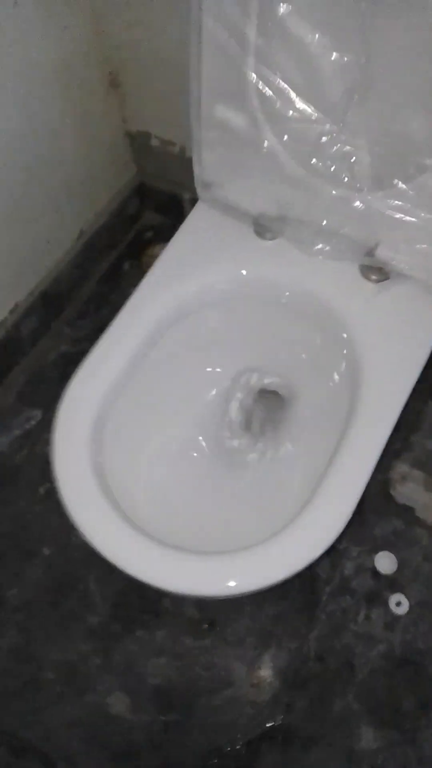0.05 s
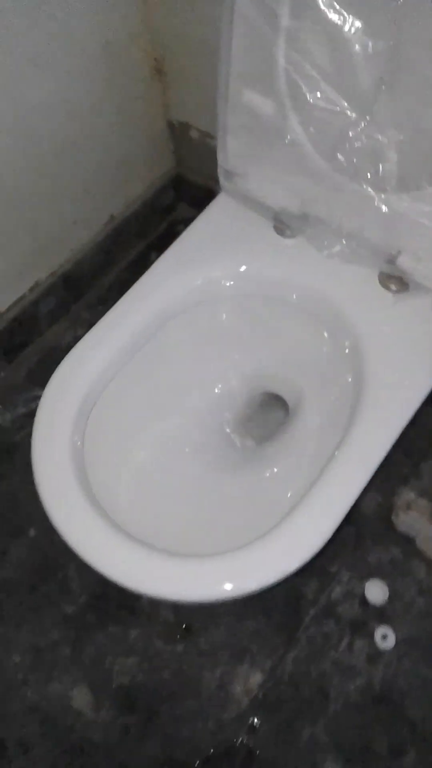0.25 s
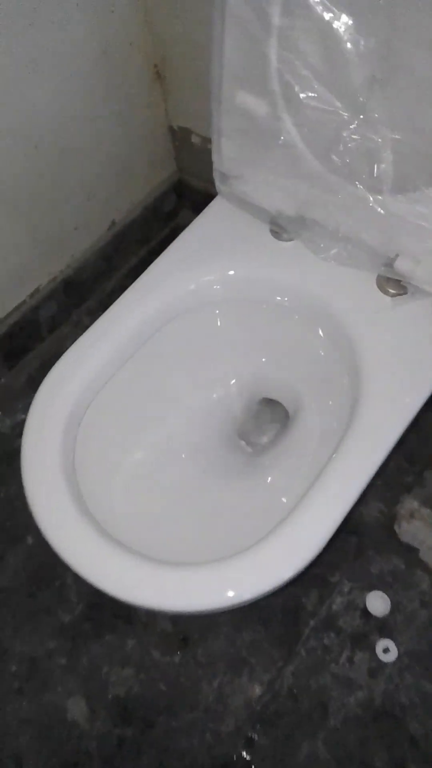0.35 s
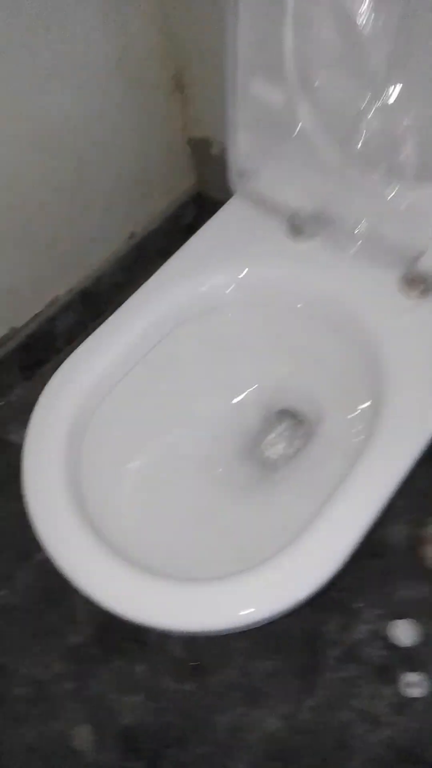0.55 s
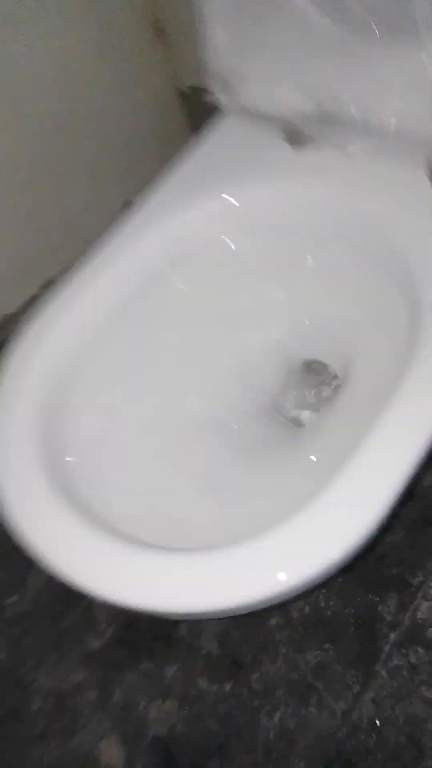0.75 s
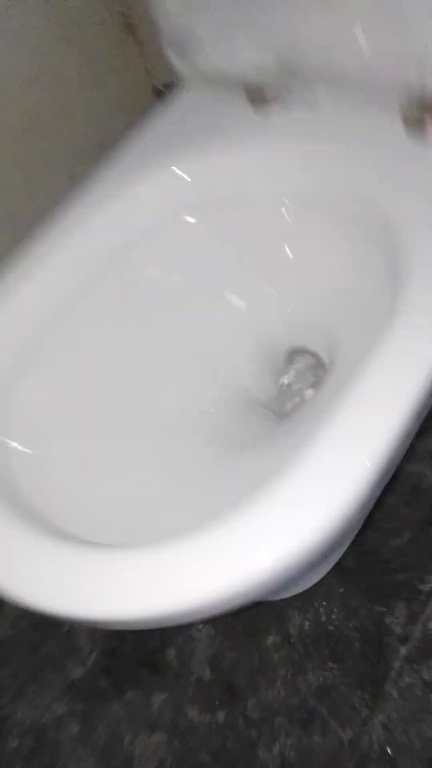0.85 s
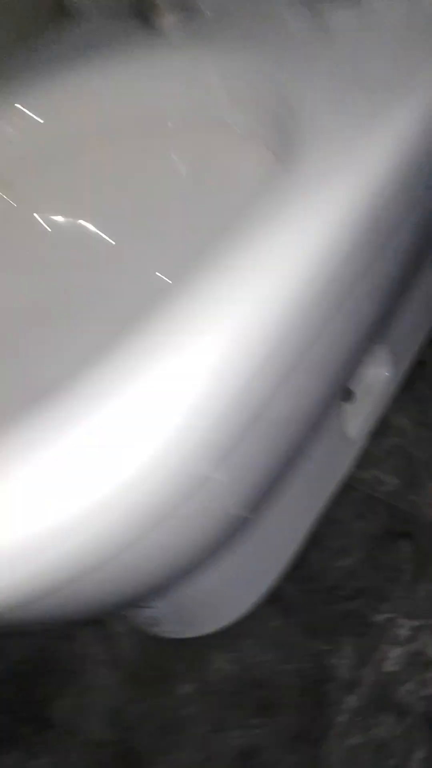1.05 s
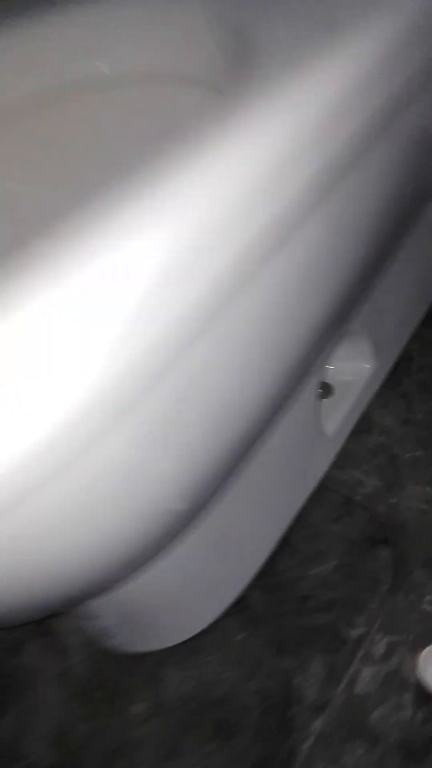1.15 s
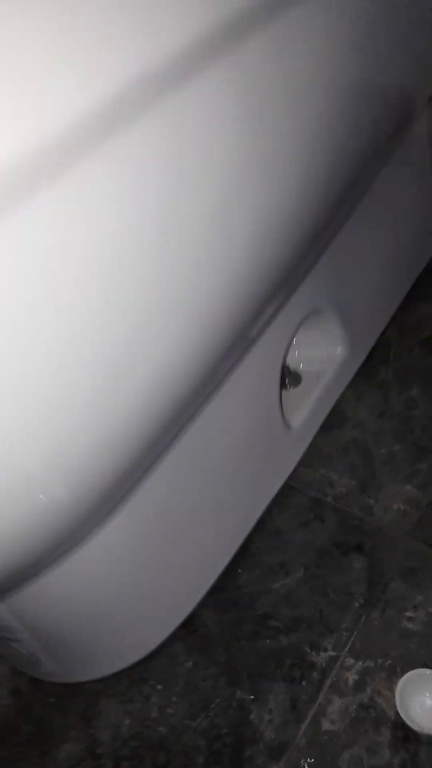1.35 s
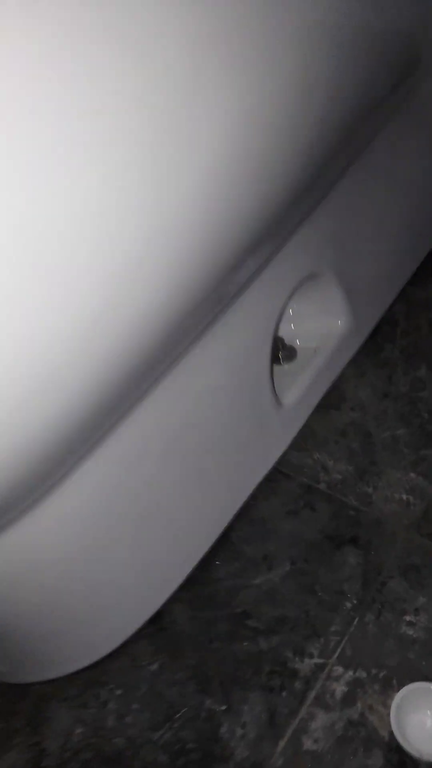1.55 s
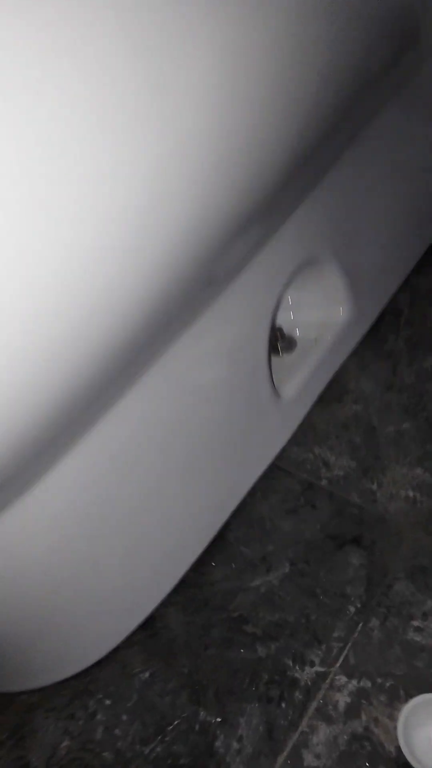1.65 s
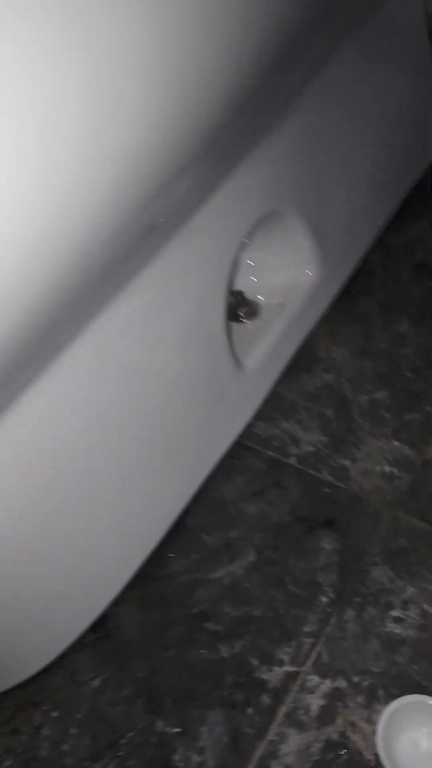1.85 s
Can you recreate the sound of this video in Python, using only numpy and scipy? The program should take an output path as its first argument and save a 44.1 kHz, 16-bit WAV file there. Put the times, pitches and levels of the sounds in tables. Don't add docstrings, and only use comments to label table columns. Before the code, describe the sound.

An empty plastic bucket gives a short rasp, then bangs hollowly on bathroom tiles with gritty rocking clacks; the echo fades over a faint drain gurgle, small ticks, then cloth rustle and soft steps, heard close.

```python
import sys
import numpy as np
from scipy import signal
from scipy.io import wavfile
from scipy.ndimage import uniform_filter1d

SR = 44100
rng = np.random.default_rng(int(sys.argv[2]) if len(sys.argv) > 2 else 0)


def to_linear_factor(level_db):
    exponent = np.asarray(level_db, float) / 20
    return 10 ** exponent


def waveform_to_disk(signal):
    frames = np.transpose(np.atleast_2d(signal))
    scaled = np.clip(frames, -1, 1) * 32767
    samples = np.round(scaled).astype(np.int16)
    wavfile.write(sys.argv[1], SR, samples)


N = 83790
TIME = np.arange(N) / SR


# time in seconds, level in dB.
SLIDE_PRESSURE = [
    (0, -59),
    (.05, -49),
    (.075, -34),
    (.095, -29),
    (.125, -37.5),
    (.16, -44.5),
    (.215, -53.5),
    (.25, -70.5),
]
# frequency in Hz, density in dB per Hz.
SLIDE_SPECTRUM = [(110, -45.5), (180, -17), (337, -10.5), (415, -9), (490, -26), (879, -6.5), (1390, -6),
                  (2230, -17), (5000, -44), (6500, -75), (11000, -120)]
# frequency in Hz, width in Hz, level in dB.
SLIDE_MODES = [(400, 68, -10.5), (830, 60, -5.5), (972, 21, 2), (1165, 100, -10.5), (1380, 56, 3.5),
               (1760, 40, -4.5), (1950, 60, -11), (2170, 80, 4), (2450, 70, 1), (3350, 64, 2)]


def bucket_slide():
    rasp = colour(grains(3), SLIDE_SPECTRUM)
    pressure_db = np.interp(TIME, *np.transpose(SLIDE_PRESSURE), right=-120)
    return to_linear_factor(pressure_db) * evened(rasp + 1.5 * resonances(rasp, SLIDE_MODES))


# start in seconds, rise in seconds, hold in seconds,
# body level in dB, grit level in dB.
CONTACTS = [(0.2201, 0.0011, 0.0077, -15.5, -24), (0.23, 0.0023, 0.014, -19.5, -37.5),
            (0.244, .003, 0.026, -33.5, -33), (0.271, .003, .005, -20, -40),
            (0.277, .005, 0.016, -25, -24.5), (0.301, .002, 0.0047, -49, -27),
            (0.309, .003, 0.0074, -25.5, -28.5), (0.326, .003, .004, -40, -40),
            (0.345, 0.003, 0.012, -30.5, -36), (0.368, .002, 0.0014, -47, -51),
            (0.3802, 0.001, 0.0039, -25, -23), (0.384, 0.005, 0.01, -27.5, -21.5),
            (0.409, .002, 0.0013, -33, -42), (0.413, 0.004, 0.0041, -40, -30),
            (0.429, 0.0087, 0.0077, -39, -29), (0.509, 0.0012, 0.0028, -36.5, -46)]
# time in seconds, level in dB.
RIM_BLOWS = [(0.2212, 4), (0.2243, 3), (0.2256, 1.5), (0.2263, 4), (0.2291, 8), (0.2383, 5.5), (0.244, -3),
             (0.2881, 3.5), (0.2994, -4.5), (0.3803, -4.5), (0.3861, -1.5), (0.507, -21)]
# frequency in Hz, density in dB per Hz.
BODY_SPECTRUM = [(90, -28), (170, -26), (205, -13.5), (445, -4.5), (600, -14), (860, 2), (1400, -3),
                 (2300, -5.5), (2650, -11.5), (2950, -21)]


def bucket_body():
    fall_s, grain_spread_db = 0.022, 4
    push = sum(stroke(start, rise, hold, db, fall_s) for start, rise, hold, db, _ in CONTACTS)
    push = push * grains(grain_spread_db)
    blows = np.zeros(N)
    for start, db in RIM_BLOWS:
        blows[round(start * SR)] = -to_linear_factor(db)
    rim_hz, rim_width_hz, rim_db = 2248, 270, -1
    clack = to_linear_factor(rim_db) * resonate(blows, rim_hz, rim_width_hz)
    return colour(push + blows + clack, BODY_SPECTRUM)


# frequency in Hz, density in dB per Hz.
GRIT_SPECTRUM = [(1760, -38.5), (3000, -9.5), (3170, -6), (6710, -8.5), (9530, 0), (12000, 1.5),
                 (14800, -5.5), (16000, -19)]
# start in seconds, rise in seconds, hold in seconds, level in dB.
CRACKS = [
    (0.2173, .001, 0.016, -33.5),
    (0.367, .001, .002, -31.5),
    (0.3763, .001, 0.011, -24.5),
    (0.43, .001, 0.0018, -37.5),
    (1.5, 0.0043, 0.021, -50),
    (1.7742, 0.00078, 0.0028, -59.5),
    (1.835, 0.0046, 0.015, -56),
]
# frequency in Hz, density in dB per Hz.
CRACK_SPECTRUM = [(1800, -15), (2800, 6.5), (4200, 3), (6000, -2), (8500, -16)]


def bucket_grit():
    fall_s = 0.035
    drag = sum(stroke(start, rise, hold, db, fall_s) for start, rise, hold, _, db in CONTACTS)
    grit = colour(drag * grains(1.5), GRIT_SPECTRUM)
    crack = sum(stroke(*row, fall_s) for row in CRACKS)
    return grit + colour(crack * grains(3), CRACK_SPECTRUM)


# frequency in Hz, level in dB, 60 dB decay time in seconds.
RING_MODES = [(207.8, 1, 1), (295.7, -2.5, 0.78), (305.5, 0.5, 0.53), (358.3, -7, 0.7), (413.5, 2, 0.55),
              (437.7, 2.5, 0.93), (436.4, -1.5, 1), (806, -8, 0.79), (867, -11, 0.13), (888, -8, 0.85),
              (922, -12.5, 0.25), (1144, -16, .3), (1290, -6, 0.13), (1456, -9, 0.69)]


def bucket_ring(body):
    bend = 0.012
    settle_s, base_hz, settled_t60_s = 0.447, 250, 0.1
    drift = uniform_filter1d(rng.standard_normal((len(RING_MODES), N // 512 + 2)), 5, 1)
    drift_time = np.arange(drift.shape[1]) * 512 / SR
    total = np.zeros(N)
    for (hz, db, t60), wander in zip(RING_MODES, drift):
        pitch = hz * (1 + bend * np.interp(TIME, drift_time, evened(wander)))
        gain = to_linear_factor(db) / np.sqrt(t60) * t60 * SR / 14
        mode = gain * resonate(body, pitch, 2.6 / t60)
        if hz < base_hz:
            mode = mode * to_linear_factor(-60 * np.maximum(TIME - settle_s, 0) / settled_t60_s)
        total += mode
    return total / np.sqrt(SR * len(RING_MODES) / 60)


def bucket():
    body, grit, slide = bucket_body(), bucket_grit(), bucket_slide()
    wet = room(to_linear_factor(-4.5) * body + to_linear_factor(-9.5) * grit + to_linear_factor(-8.5) * slide)
    return body + grit + slide + to_linear_factor(-9.5) * bucket_ring(body) + wet


# time in seconds, hiss level in dB, rub pitch in Hz, rub level in dB.
CLOTH_MOTION = [(0, -58, 2500, -90), (0.202, -60.5, 3500, -69.5), (0.759, -54, 4540, -65),
                (0.862, -59, 3040, -87), (1.048, -54, 1474, -63), (1.088, -64.5, 1340, -70),
                (1.22, -64, 867, -70), (1.309, -56.5, 1100, -49.5), (1.355, -48.5, 1515, -54),
                (1.42, -41.5, 1947, -44.5), (1.49, -49, 2400, -54.5), (1.518, -42.5, 2800, -50),
                (1.575, -44.5, 2276, -60), (1.62, -53, 2920, -66.5), (1.68, -72, 3036, -79),
                (1.785, -83.5, 1590, -91), (1.797, -42.5, 1600, -50.5), (1.9, -58.5, 1564, -82)]
# frequency in Hz, density in dB per Hz.
WEAVE_SPECTRUM = [(1470, -33.5), (2500, -9), (2940, -10.5), (3630, -13), (4210, -10.5), (6150, -14.5),
                  (10500, -4.5), (14700, -15.5), (16000, -5)]
# frequency in Hz, width in Hz, level in dB.
BOWL_HOLLOWS = [(813, 40, -5.5), (1100, 90, -3.5), (1370, 150, -2), (1882, 70, -0.5), (2185, 90, -2),
                (2651, 50, -0.5), (2939, 100, 1.5), (3460, 140, 3), (4136, 140, 1.5), (4560, 120, 0),
                (4930, 80, -3)]


def cloth():
    patchy_db, rub_width_hz = 4, 1200
    times, hiss_db, rub_hz, rub_db = np.transpose(CLOTH_MOTION)
    _, _, spectrum = signal.stft(grains(0.78), SR, nperseg=256)
    patches = uniform_filter1d(rng.standard_normal(spectrum.shape), 2, 0)
    patches = evened(uniform_filter1d(patches, 20, 1))
    patchy = signal.istft(spectrum * to_linear_factor(patchy_db * patches), SR, nperseg=256)[1][:N]
    hiss = evened(colour(patchy, WEAVE_SPECTRUM))
    pitch = np.interp(TIME, times, rub_hz)
    rub = resonate(grains(3.5), pitch, rub_width_hz)
    rub = resonate(rub, pitch, rub_width_hz)
    rub = resonances(resonances(rub, BOWL_HOLLOWS), BOWL_HOLLOWS)
    return to_linear_factor(np.interp(TIME, times, hiss_db)) * hiss + to_linear_factor(np.interp(TIME, times, rub_db)) * rub


# start in seconds, rise in seconds, hold in seconds, level in dB.
STEPS = [
    (1.351, 0.00425, 0.0024, -42.5),
    (1.38, 0.009, 0.066, -48.5),
    (1.465, 0.0027, 0.09, -63.5),
    (1.644, 0.00335, .002, -63),
    (1.717, 0.00233, 0.0023, -63.5),
    (1.772, 0.00217, 0.027, -43.5),
    (1.799, .003, 0.018, -39),
    (1.834, 0.0036, 0.023, -43.5),
    (1.863, 0.0031, 0.025, -55),
]
# frequency in Hz, density in dB per Hz.
STEP_SPECTRUM = [(60, -17), (170, -15.5), (215, -3), (300, -3.5), (460, 0.5), (620, -9), (900, -21),
                 (1500, -23)]
# frequency in Hz, width in Hz, level in dB.
FLOOR_MODES = [(469, 20, -0.5), (305, 19, -3), (372, 18, -16), (623, 43, -9.5), (766, 46, -12),
               (930, 63, -6)]


def steps():
    fall_s, heel_db = 0.053, 27
    push = sum(stroke(*row, fall_s) for row in STEPS) * rng.standard_normal(N)
    heels = np.zeros(N)
    for start, rise, hold, db in STEPS:
        heels[round((start + rise) * SR)] = to_linear_factor(db + heel_db - 1400 * rise)
    thud = colour(push + heels, STEP_SPECTRUM)
    boom = sum(to_linear_factor(db + 1.5) * resonate(thud, hz, width) for hz, width, db in FLOOR_MODES)
    dry = thud + boom
    return dry + to_linear_factor(-9.5) * room(dry)


# time in seconds, peak level in dB.
TICKS = [(0.0819, -27), (0.5702, -42), (0.5853, -29.5), (0.5899, -35.5), (0.659, -33), (0.69, -42),
         (0.7259, -33.5), (0.7612, -47), (0.9041, -36.5), (0.9747, -32.5), (0.9844, -37.5), (1.1763, -39.5),
         (1.3582, -24.5), (1.4545, -27.5), (1.502, -33), (1.5644, -32), (1.6398, -44), (1.7756, -37.5),
         (1.798, -27.5), (1.818, -26), (1.876, -52), (1.892, -49)]
# frequency in Hz, density in dB per Hz.
TICK_SPECTRUM = [(880, -35.5), (1500, -3.5), (3520, -10.5), (6630, -13), (10000, -0.5), (12500, -2),
                 (16000, -10)]


def ticks():
    fall_s = 0.019
    snap = sum(stroke(start, 0.00077, 0.0006, db - 10, fall_s) for start, db in TICKS)
    dry = colour(snap * rng.standard_normal(N), TICK_SPECTRUM)
    return dry + to_linear_factor(-6.5) * room(dry)


# time in seconds, level in dB.
DRAIN_LEVEL = [
    (.3, -63),
    (.55, -48.5),
    (0.8, -50),
    (1.0, -53.5),
    (1.06, -85.5),
    (1.297, -59.5),
    (1.6, -52.5),
    (1.75, -61.5),
    (1.9, -62),
]
# frequency in Hz, width in Hz, level in dB.
DRAIN_PIPE = [(215.5, 28, -4.5), (298.8, 72, 0), (372, 37, -4), (434, 18, 3), (790, 49.9, -8),
              (883, 45, -4), (1380, 200, -8.5)]


def drain():
    sag_per_s = 0.074
    bowl_hz, empty_s, fade_s, fade_db = 600, 0.76, 0.047, -27
    noise = rng.standard_normal(N)
    sag = 1 - sag_per_s * np.minimum(TIME - 0.5, 0.5)
    fade = fade_db * np.clip((TIME - empty_s) / fade_s, 0, 1)
    slosh = np.zeros(N)
    for hz, width, db in DRAIN_PIPE:
        once = resonate(noise, hz * sag, width)
        slosh += to_linear_factor(db + fade * (hz > bowl_hz)) * resonate(once, hz * sag, width)
    times, level_db = np.transpose(DRAIN_LEVEL)
    return to_linear_factor(np.interp(TIME, times, level_db, left=-100)) * evened(slosh)


# frequency in Hz, density in dB per Hz.
AIR_SPECTRUM = [(30, -15), (70, -9), (160, -24.5), (300, -3.5), (700, -15), (1600, -15.5), (2500, -26),
                (11000, -33.5), (16000, -34.5)]


def still_air():
    return to_linear_factor(-64) * evened(colour(rng.standard_normal(N), AIR_SPECTRUM))


# frequency in Hz, 60 dB decay time in seconds.
ROOM_DECAY = [(150, 1.2), (220, 1.2), (300, 1.4), (450, 1.24), (600, 0.85), (880, 0.71), (1400, 0.65),
              (2400, 0.41), (10000, 0.29)]


def room(x):
    taps = np.zeros(SR)
    at = np.arange(200, SR - 20, 20) + rng.integers(0, 20, (SR - 201) // 20)
    taps[at] = rng.choice([-1., 1.], at.shape)
    hz, t, spectrum = signal.stft(taps, SR, nperseg=1024, noverlap=768)
    decay = to_linear_factor(-60 * t / read(ROOM_DECAY, hz)[:, None])
    tail = signal.istft(spectrum * decay, SR, nperseg=1024, noverlap=768)[1]
    return signal.fftconvolve(x, tail / np.linalg.norm(tail))[:N]


def resonate(x, hz, width_hz):
    turn = np.exp(2j * np.pi * np.cumsum(hz * np.ones(N)) / SR)
    r = np.exp(-np.pi * width_hz / SR)
    return 2 * (turn * signal.lfilter([1 - r], [1, -r], x / turn)).real


def resonances(x, table):
    return evened(sum(to_linear_factor(db) * resonate(x, hz, width) for hz, width, db in table))


def stroke(start, rise, hold, db, fall):
    t = TIME - start
    return np.clip(t / rise, 0, 1) ** 2 * to_linear_factor(db - 60 * np.maximum(t - rise - hold, 0) / fall)


def grains(spread_db):
    size_db = spread_db * np.minimum(rng.exponential(1, N // 32 + 1), 3)
    return evened(to_linear_factor(np.repeat(size_db, 32)[:N]) * rng.standard_normal(N))


def colour(x, points):
    hz = abs(np.fft.fftfreq(4096, 1 / SR))
    low, high = points[0][0], points[-1][0]
    outside = np.maximum(low / (hz + 1), 1) * np.maximum(hz / high, 1)
    db = read(points, hz) - 24 * np.log2(outside)
    log_gain = np.log(to_linear_factor(np.maximum(db, -100)))
    phase = -signal.hilbert(log_gain).imag
    taps = np.fft.ifft(np.exp(log_gain + 1j * phase)).real[:2048]
    return signal.oaconvolve(x, taps / np.linalg.norm(taps))[:N]


def read(points, hz):
    f, value = np.transpose(points)
    return np.interp(np.log(hz + 1), np.log(f + 1), value)


def evened(x):
    return x / np.sqrt(np.mean(x ** 2) + 1e-20)


def scene():
    return (bucket() + cloth() + steps() + ticks() + drain() + still_air())[None]


def roll_off(x):
    return signal.sosfilt(signal.butter(12, 16450, fs=SR, output="sos"), x)


def record(dry):
    edge_hz = 15750
    low_pass = signal.firwin(401, edge_hz, window=("kaiser", 8), fs=SR)
    mix = signal.oaconvolve(np.tanh(dry), low_pass[None], "same")
    return roll_off(mix)


dry = scene()
out = record(dry)
waveform_to_disk(out)
```